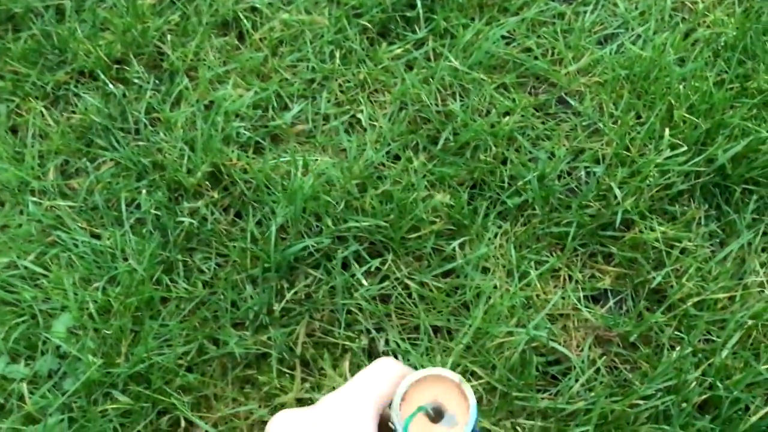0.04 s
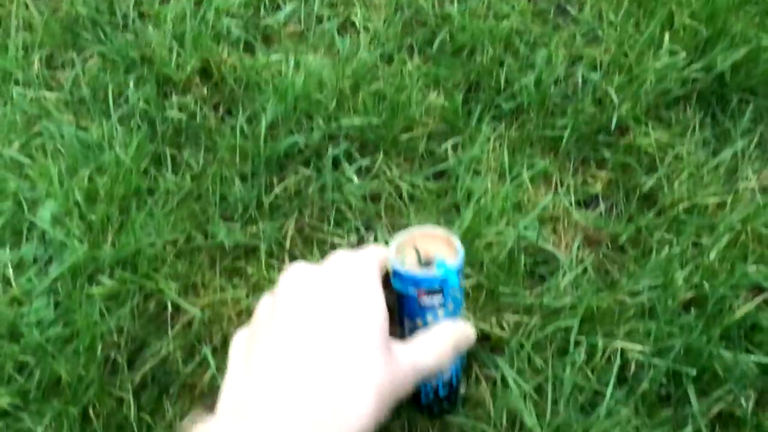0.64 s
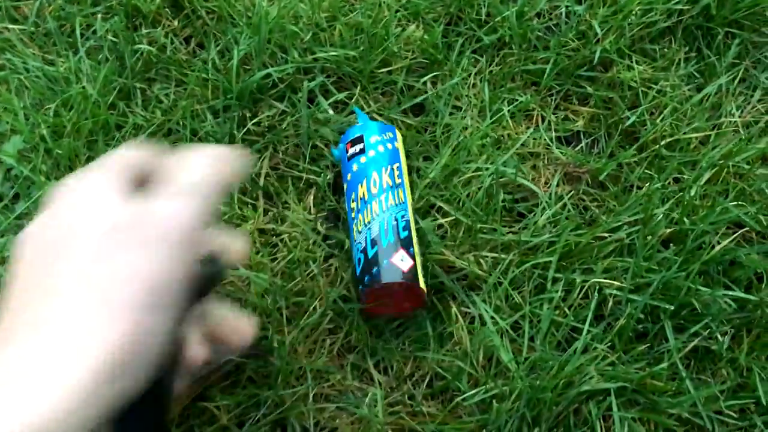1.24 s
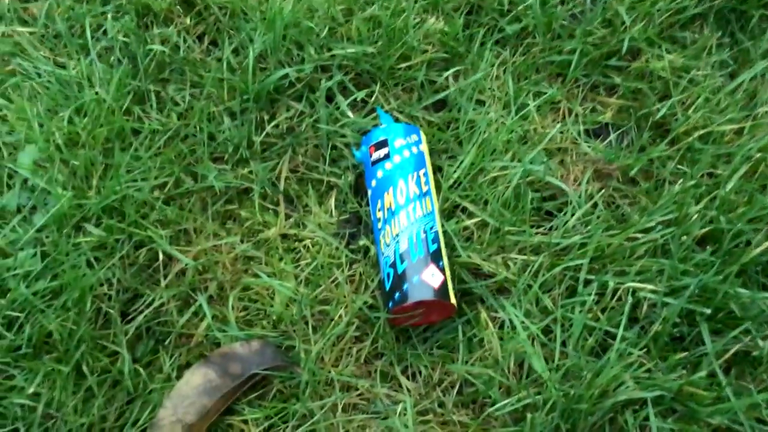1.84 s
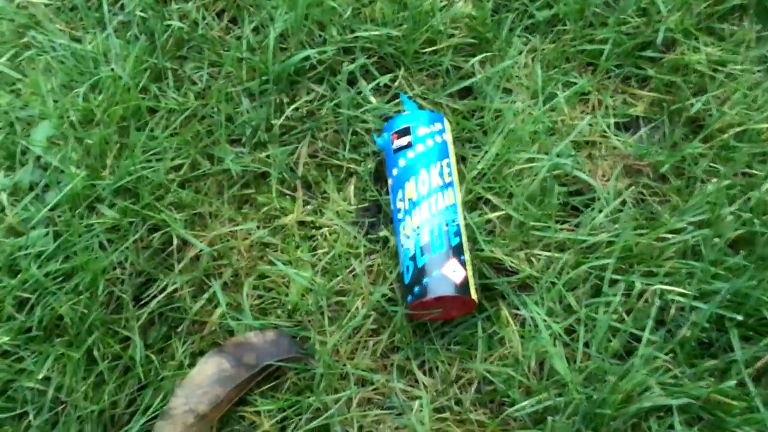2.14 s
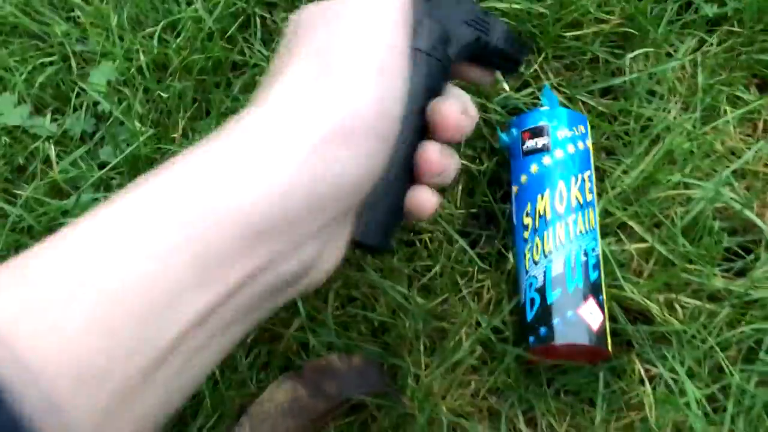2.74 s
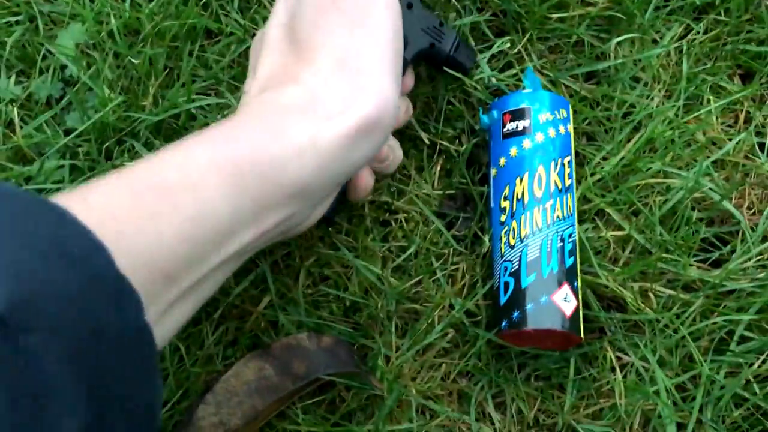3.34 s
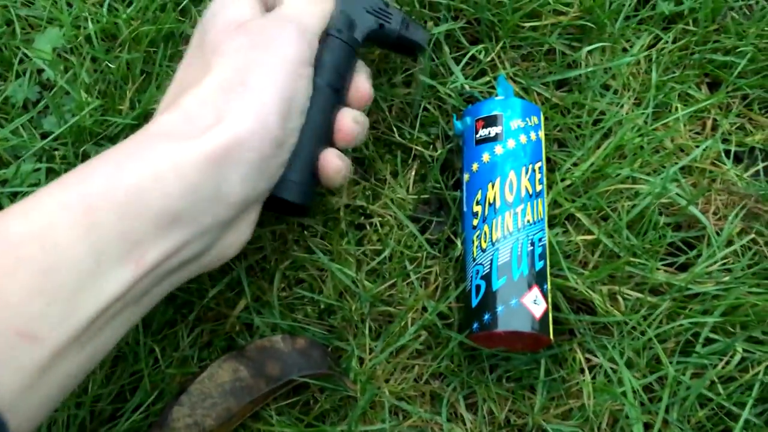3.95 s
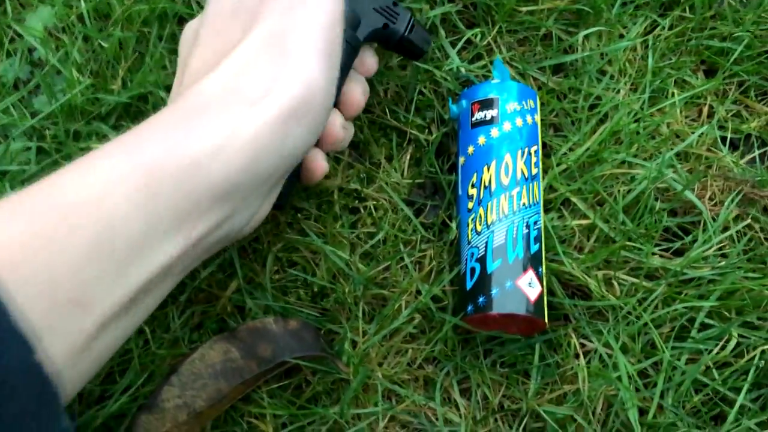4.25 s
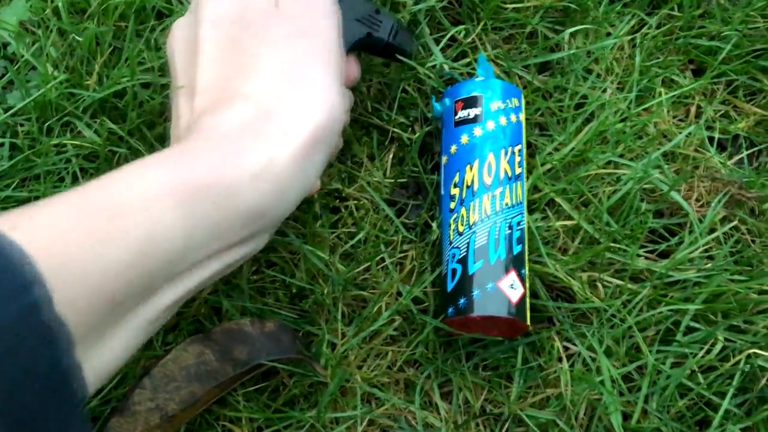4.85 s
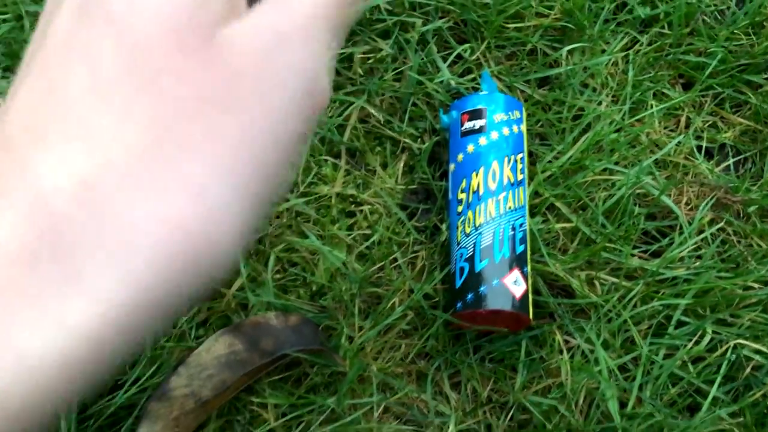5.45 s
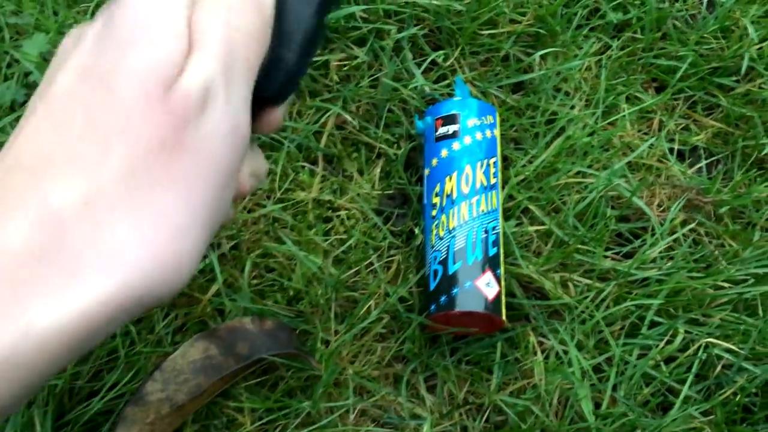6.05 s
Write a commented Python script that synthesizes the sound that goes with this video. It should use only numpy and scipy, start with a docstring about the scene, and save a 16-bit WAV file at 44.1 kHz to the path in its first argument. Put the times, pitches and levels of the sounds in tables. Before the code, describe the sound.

A gas torch lighter clicks and hisses softly twice outdoors, amid wind rumble on the microphone, handling bumps and sleeve scuffs.

```python
"""Torch lighter on a lawn

A smoke fountain is set down on open grass and a gas torch lighter is held to its fuse, close to a
hand-held camera. The trigger clicks, the jet hisses twice with a drifting comb of peaks and notches,
and short puffs of gas escape in between. Wind and handling rumble in the microphone; a jacket rustles,
and at the end its sleeve drags over the microphone port."""
import sys
import numpy as np
from scipy import signal
from scipy.fft import rfft, irfft, next_fast_len
from scipy.io import wavfile
from scipy.ndimage import uniform_filter1d

SR = 44100
rng = np.random.default_rng(int(sys.argv[2]) if len(sys.argv) > 2 else 0)


def dump(signal):
    """Clip the signal to [-1, 1] and save it as 16-bit WAV at the path in sys.argv[1]."""
    limited = np.clip(np.atleast_2d(signal).T, -1, 1)
    pcm = np.round(limited * 32767).astype(np.int16)
    wavfile.write(sys.argv[1], SR, pcm)


N = 273420
T = np.arange(N) / SR


# two burns at the fuse: t/s, length/s, level/dB, spit/dB, swell/dB, comb f/Hz at start, middle, end
BURNS = [(3.286, 0.425, -67, 4, 2, 6880, 6900, 6660), (4.411, 0.67, -66.5, 7, 1.5, 5960, 7050, 5060)]
# spectrum of the bare jet: f/Hz, level/dB
JET_SPECTRUM = [(200, -60), (800, -43), (2500, -7.5), (5000, -7), (7000, -3), (10000, -1), (12000, -3),
                (14000, -8.5), (15500, -0.5)]
# drifting peaks and notches in the hiss: multiple of the comb frequency, width/Hz, full gain/dB
JET_COMB = [(.985, 1600, 10.5), (1.15, 420, -14.5), (1.249, 1150, 8.5), (1.38, 700, -2), (.61, 500, 4.5),
            (.79, 700, -3), (1.62, 1100, 2), (1.85, 900, 4.5), (2.05, 1300, 6.5)]
# steady resonances of the torch head: f/Hz, width/Hz, full gain/dB
HEAD_RESONANCES = [(6850, 1400, 3.5), (8450, 700, 2.5), (13100, 1800, 7.5), (13500, 280, 4.5),
                   (14100, 800, 3), (10900, 1700, -4.5)]
# the top of the jet brightens late in each burn: middle t/s, length/s, gain/dB, f/Hz, width/Hz
FLARES = [(3.645, .085, 9, 15200, 1100), (4.91, 0.18, 8, 15000, 1600)]

def torch(open_s=0.015, shut_s=0.035, spit_s=0.01, surge_db=2.5, flutter_db=1.06):
    """The close gas jet spits, swells and flares; a comb in its hiss rises, deepens and sinks again."""
    out = np.zeros(N)
    for s, length, jet_db, spit_db, swell_db, first_hz, middle_hz, last_hz in BURNS:
        hz, t, jet = signal.stft(noise(JET_SPECTRUM, grain_db=0.6), SR, nperseg=512)
        hz = hz[:, None]
        progress = np.clip((t - s) / length, 0, 1)
        arch = 1 - (2 * progress - 1) ** 2
        bend_hz = middle_hz - (first_hz + last_hz) / 2
        comb_hz = first_hz + (last_hz - first_hz) * progress + bend_hz * arch
        strength = 0.4 + 0.58 * arch ** 1.4
        comb_db = sum(db * bump(hz, k * comb_hz, width) for k, width, db in JET_COMB)
        head_db = sum(db * bump(hz, at, width) for at, width, db in HEAD_RESONANCES)
        flare_db = sum(db * bump(hz, at, width) * bump(t, when, span)
                       for when, span, db, at, width in FLARES)
        colour = amp(strength * (comb_db + head_db) + flare_db + swell_db * arch)
        hiss = signal.istft(jet * colour, SR, nperseg=512)[1][:N]
        flow_db = spit_db * np.exp(-np.abs(T - s - open_s) / spit_s)
        flow_db += surge_db * bump(T, s + length - 0.056, 0.11)  # just before the valve shuts
        flow_db += flutter_db * wobble(35)
        out += bursts([(s, length, jet_db)], open_s, shut_s) * amp(flow_db) * hiss
    return out


# gas let out at the lighter: t/s, length/s, level/dB
PUFFS = [(3.645, 0.063, -66), (3.994, 0.035, -60), (4.203, 0.047, -65.5), (4.985, 0.053, -63)]
# spectrum of a puff: f/Hz, level/dB
PUFF_SPECTRUM = [(200, -70), (1500, -17), (2800, 9), (3700, 3), (4700, 2), (5600, 4), (7200, 7.5),
                 (8300, -1), (9400, 6), (11800, 3.5), (14000, 0), (15600, 1)]

def puffs():
    """Gas escapes in short puffs as the valve opens or shuts."""
    return bursts(PUFFS, rise_s=0.0064, fall_s=0.015) * noise(PUFF_SPECTRUM)


# airy whistle at the end of the second burn: t/s, level/dB, f/Hz
VALVE_WHISTLE = [(4.97, -90, 4900), (5.01, -74, 4750), (5.045, -68, 4650), (5.085, -80, 4500)]

def valve():
    """The last of the gas sings in the narrowing valve."""
    return moving_band(VALVE_WHISTLE, width_hz=610)


# lighter, trigger and camera case, close by: t/s, body level/dB, body f/Hz, snap level/dB, snap f/Hz
CLICKS = [(0.164, -55, 2900, -50, 9500), (0.171, -70, 2900, -56, 10500), (0.914, -78, 2900, -48, 11500),
          (1.5678, -37, 1520, -44, 7000), (2.7595, -70, 2900, -50.5, 10900),
          (2.9880, -54, 2820, -43.5, 11900), (3.055, -53, 2950, -53, 8000), (3.088, -72, 2900, -56, 9000),
          (3.1517, -72, 2930, -55, 8950), (3.2233, -46.5, 2880, -49, 4700),
          (3.3970, -42.5, 3040, -47, 4800), (3.6784, -58, 2960, -45.5, 7000),
          (5.0906, -39, 1500, -44.5, 3500)]
# modes of the plastic: multiple of the body frequency, gain/dB, t60/s
PLASTIC_MODES = [(.6, -11.5, 0.0059), (1, 2, 0.0084), (1.5, -0.5, 0.0053), (1.75, 15.5, 0.0014),
                 (2.4, 7, 0.00086)]

def clicks(contact_s=0.0003, snap_t60=0.0098, snap_octaves=2.3):
    """Each click rings the damped plastic body and adds a short bright snap."""
    out, t = np.zeros(N), np.arange(SR // 16) / SR
    contact = 1 - np.exp(-t / contact_s)
    octave = np.log2(np.fft.rfftfreq(len(t), 1 / SR) + 1)
    for s, body_db, hz, snap_db, snap_hz in CLICKS:
        ring = sum(amp(db - 60 * t / t60) * np.sin(2 * np.pi * k * hz * t)
                   for k, db, t60 in PLASTIC_MODES)
        snap = short_noise(len(t), bump(octave, np.log2(snap_hz), snap_octaves))
        add(out, s, (amp(body_db) * ring + amp(snap_db - 60 * t / snap_t60) * snap) * contact)
    return out


# breeze at the microphone between gusts: t/s, strength/dB
BREEZE = [(0, -59), (.17, -55), (.36, -52), (1.0, -42.5), (1.55, -42), (2.0, -38.5), (2.42, -35.5),
          (2.48, -51.5), (2.95, -44), (3.2, -50.5), (3.46, -56.5), (3.7, -52.5), (4.2, -55), (4.45, -55.5),
          (5.1, -57), (5.4, -44), (5.65, -46), (5.9, -56), (6.2, -50.5)]
# gusts on top of it: middle t/s, length/s, rise/dB, tilt from rumble to eddies/dB
GUSTS = [(0.235, 0.096, 10, -5), (0.475, 0.21, 10.5, -2), (0.657, 0.17, 9, -0.5), (0.756, 0.081, 10, -1),
         (0.85, 0.16, 7.5, 0.5), (1.012, 0.27, 1.5, 0.5), (1.148, 0.18, 5, 3.5), (1.324, 0.17, 6.5, -1),
         (1.62, 0.065, 9, -5), (1.704, 0.12, 5.5, -2.5), (1.814, 0.31, 3, 4), (2.027, 0.054, 10.5, 2),
         (2.116, 0.059, 8.5, -5.5), (2.191, 0.065, 6, 0), (2.28, 0.1, 5.5, 2.5), (2.382, 0.12, 4, 2.5),
         (2.632, 0.13, 12, -1), (2.706, 0.06, 12.5, -4), (2.85, 0.18, 8.5, 4.5), (3.038, 0.13, 5.5, 6),
         (3.16, 0.069, 7.5, -1.5), (3.302, 0.08, 9, 4), (3.392, 0.13, 5, -7), (3.536, .08, 7, -3),
         (3.614, 0.043, 10.5, -2), (3.727, 0.2, 5, -1.5), (3.865, 0.022, 10, -1.5), (3.969, 0.036, 6, -4),
         (4.064, 0.12, 5, -5), (4.162, 0.12, 15, -4.5), (4.351, 0.053, 6.5, -4.5),
         (4.837, 0.047, 8.5, -6.5), (5.06, 0.081, 8.5, 3.5), (5.22, 0.22, 6.5, 0.5)]
# spectra of the three wind layers, darkest first: f/Hz, level/dB
RUMBLE_SPECTRUM = [(12, -69), (25, -24), (38, -5), (52, 3), (85, 3), (120, -4), (200, -46), (600, -120)]
BUFFET_SPECTRUM = [(20, -69), (50, 0.5), (100, 1), (150, 3.5), (230, -4.5), (320, -23.5), (450, -55),
                   (800, -60), (2500, -120)]
EDDY_SPECTRUM = [(60, -57), (150, -12.5), (260, 7), (390, -2), (520, -11), (750, -21), (1200, -41.5),
                 (4000, -100)]

def wind(usual_strength_db=-40, unrest_db=1):
    """Wind on the microphone rumbles, buffets and eddies; brighter layers grow faster in a gust."""
    middle, length, rise, tilt = np.transpose(GUSTS)
    excess_db = curves(BREEZE)[0] + swells(zip(middle, length, rise)) - usual_strength_db
    tilt_db = swells(zip(middle, length, tilt))

    def follow(base_db, growth):
        return amp(base_db + growth * excess_db + unrest_db * wobble(14))

    rumble = follow(-39.5, growth=0.65) * amp(-tilt_db) * turbulence(RUMBLE_SPECTRUM, steady_s=0.095)
    buffet = follow(-41, growth=1.076) * turbulence(BUFFET_SPECTRUM, steady_s=0.12)
    eddy_gain = follow(-54, growth=1.24) * amp(tilt_db)
    eddies = unit(amp(3.3 * wobble(80)) * turbulence(EDDY_SPECTRUM, steady_s=0.095))
    return rumble + buffet + eddy_gain * eddies


# wind and handling, right on the camera: t/s, level/dB before trim, f/Hz, narrowness of the spectrum
THUMPS = [(0.368, -21, 102, 4.7), (0.429, -20.5, 85, 6.3), (0.486, -25.5, 190, 2.8), (0.663, -22, 126, 2.7),
          (0.758, -20, 161, 3.7), (0.779, -17, 91, 4), (0.829, -22, 150, 2.4), (0.87, -21.5, 170, 4),
          (1.139, -20.5, 183, 4.9), (1.173, -18, 106, 3.4), (1.304, -19, 78.5, 2.6), (1.367, -22, 170, 1.9),
          (1.394, -22, 129, 4.3), (1.607, -18.5, 200, 1.7), (1.615, -17, 80, 3.8), (1.687, -14, 215, 4),
          (1.693, -16.5, 191, 2), (1.806, -14.5, 102, 6.2), (1.858, -20, 182, 6.5), (1.936, -19, 165, 8.3),
          (2.009, -19.5, 214, 2.7), (2.032, -17.5, 234, 1.55), (2.102, -20.5, 205, 2),
          (2.119, -23, 131, 2.2), (2.13, -35, 84.6, 3.6), (2.172, -19.5, 190, 2.1), (2.195, -18, 190, 4),
          (2.246, -19, 176, 7.7), (2.266, -17, 150, 1.4), (2.307, -10, 230, 2.2), (2.712, -25, 75.5, 3.8),
          (2.882, -25, 189, 4.1), (3.009, -25.5, 140, 4), (3.287, -42, 656, 4.1), (3.383, -20, 75, 1.9),
          (3.61, -33.5, 170, 1.6), (4.141, -28, 131, 1.6), (4.177, -27.5, 95, 6.3),
          (5.346, -33.5, 393, 2.3), (5.486, -13.5, 275, 5.6), (5.5013, -18, 290, 5.2),
          (5.552, -15.5, 109, 2.7)]

def thumps(trim_db=-6.0):
    """Each thump is one swing of pressure whose spectrum peaks at its pitch and trails off upward."""
    out, t = np.zeros(N), np.arange(-SR // 20, SR // 20) / SR
    for s, db, hz, narrowness in THUMPS:
        swing = (1 - 2j * np.pi * hz * t / narrowness) ** -(narrowness + 1)
        add(out, s + t[0], amp(db + trim_db) * swing.imag)
    return out


# the sleeve leans on the camera and drags in pushes: t/s, length/s, level/dB
DRAGS = [(5.343, 0.89, -52.5), (5.433, 0.071, -39), (5.48, 0.18, -52), (5.725, 0.13, -52)]
# its hem scrapes over the case: t/s, length/s, level/dB
SCRAPES = [(5.408, 0.044, -53), (5.433, 0.02, -40.5), (5.446, 0.035, -52.5), (5.54, 0.013, -42),
           (5.816, 0.01, -45)]
# the cloth catches and slips: t/s, level/dB, t60/s, f/Hz
SLIPS = [(1.517, -46.5, 0.011, 1600), (1.543, -38.5, 0.009, 1600), (1.567, -35.5, 0.046, 1670),
         (2.114, -49, 0.15, 1560), (3.284, -50.5, 0.027, 1000), (5.343, -62, 0.036, 1500),
         (5.434, -35.5, 0.03, 1550), (5.456, -43, 0.043, 1340), (5.5405, -40, 0.04, 1000),
         (5.585, -63, 0.027, 1500), (5.742, -46.5, 0.082, 2500), (5.769, -38, 0.05, 1550),
         (5.779, -34, 0.03, 1550), (5.817, -36.5, 0.033, 2010), (5.827, -37.5, 0.051, 1750),
         (5.668, -40, 0.055, 850), (5.71, -48, .04, 1900), (6.101, -51, 0.04, 1600)]
# spectra of drag, scrape and slip: f/Hz, level/dB
DRAG_SPECTRUM = [(30, -52), (100, 19.5), (250, 13.5), (550, 10), (1000, 1.5), (1600, 0.5), (2500, -5),
                 (4200, -15), (5200, -29), (8000, -41), (15500, -59)]
SCRAPE_SPECTRUM = [(300, -24), (900, 12), (1700, 3), (2600, -6), (4200, -5), (5800, -14), (7500, -25),
                   (10000, -34), (15500, -37)]
SLIP_SPECTRUM = [(50, -62), (200, 29), (700, 1), (1050, 6.5), (1600, 15), (2400, 1.5), (3300, -6.5),
                 (6000, -38), (9000, -39), (15500, -42)]

def sleeve():
    """Dull, gritty friction on the camera itself, broken by sudden slips and crisp scrapes."""
    pushes = bursts(DRAGS, rise_s=0.0016, fall_s=0.061)
    drag = pushes * friction(DRAG_SPECTRUM, per_s=1300, spread_db=0)
    scrapes = bursts(SCRAPES, rise_s=0.0033, fall_s=0.025) * noise(SCRAPE_SPECTRUM, grain_db=5.5)
    return drag + scrapes + catches(SLIPS, SLIP_SPECTRUM, usual_hz=1600)


# low flutter as the sleeve nears the microphone port: t/s, length/s, level/dB
HOLLOW_FLUTTER = [(5.195, 0.11, -42)]
# squeak right on the port: t/s, level/dB, f/Hz
SQUEAK = [(5.432, -37, 803), (5.436, -40.5, 775), (5.446, -38, 664), (5.457, -36.5, 547), (5.464, -53, 520),
          (5.478, -48, 596), (5.503, -45, 569), (5.53, -53, 536)]

def port_scuff(jitter=0.071, tone_share=0.75):
    """The sleeve flutters hollowly, then sticks and slips across the port in a rough, falling squeak."""
    hollow = bursts(HOLLOW_FLUTTER, rise_s=0.0052, fall_s=0.061) * band_noise(238, width_hz=79)
    pitch_hz = curves(SQUEAK)[1] * (1 + jitter * wobble(500))
    tone = level(SQUEAK) * unit(np.sin(2 * np.pi * np.cumsum(pitch_hz) / SR))
    rasp = moving_band(SQUEAK, width_hz=260)
    return hollow + np.sqrt(tone_share) * tone + np.sqrt(1 - tone_share) * rasp


# the hand shifts on the fountain's cardboard tube, close by: t/s, length/s, level/dB
GRIP_SHIFTS = [(-.02, 0.12, -51.5), (.08, 0.12, -52.5), (.19, 0.082, -52), (.29, 0.11, -60)]
# the tube crackles under the fingers: t/s, level/dB, t60/s, f/Hz
CRACKLES = [(.0205, -36, 0.01, 1200), (.0385, -59, 0.01, 1450), (.051, -40, 0.02, 1430),
            (.062, -48, 0.026, 1590), (.087, -51, 0.044, 1450), (.194, -50, 0.06, 1400),
            (.208, -52, 0.046, 1400), (.2355, -44, 0.02, 1450), (.252, -48, 0.028, 1500),
            (.269, -47.5, 0.015, 1700), (.302, -48, 0.011, 1300), (.334, -49, 0.013, 1500)]
# spectra of crunch and crackle: f/Hz, level/dB
CRUNCH_SPECTRUM = [(150, 13), (500, 0.5), (1000, 4), (1500, 1), (2400, -7.5), (4000, -18), (6500, -21),
                   (15500, -26)]
CRACKLE_SPECTRUM = [(200, -25), (800, -2.5), (1450, 6.5), (2300, -6.5), (3600, -16), (5600, -9.5),
                    (7500, -21), (11000, -21), (15500, -26)]

def grip():
    """Fingers crunch softly on the tube, which answers with short, papery crackles."""
    shifts = bursts(GRIP_SHIFTS, rise_s=0.011, fall_s=0.035)
    crunch = shifts * friction(CRUNCH_SPECTRUM, per_s=690, spread_db=3.5)
    return crunch + catches(CRACKLES, CRACKLE_SPECTRUM, usual_hz=1450)


# the arm brushes jacket and grass beside the camera: t/s, length/s, level/dB
RUSTLES = [(.16, 0.23, -70), (.36, 0.13, -66.5), (.43, 0.23, -63), (.61, .19, -65), (.87, 0.18, -73),
           (1.04, 0.2, -69.5), (1.27, 0.65, -64), (1.85, 0.33, -66), (2.08, 0.27, -64.5),
           (2.3, 0.18, -60.5), (2.43, 0.494, -64), (2.87, 0.25, -69), (3.76, 0.14, -70), (4.98, 0.25, -64),
           (5.17, 0.22, -67)]
# quick swishes of the jacket: t/s, length/s, level/dB
SWISHES = [(1.196, 0.1, -59.5), (1.24, 0.063, -71.5), (1.566, 0.1, -55), (1.66, 0.18, -61.5),
           (2.478, 0.015, -49.5), (5.54, 0.048, -64)]
# cloth brushes on cloth: t/s, length/s, level/dB, f/Hz, width/Hz
BRUSHES = [(0.744, 0.097, -72, 4030, 2000), (1.03, 0.091, -68, 4230, 1800), (1.68, 0.11, -67.5, 5040, 1800),
           (2.085, 0.061, -58.5, 3850, 2100), (2.235, 0.058, -68, 4170, 600),
           (2.322, 0.076, -72, 2400, 400), (2.355, 0.1, -67.5, 4150, 550), (2.574, .16, -72.5, 3550, 400),
           (2.734, .22, -73, 2260, 300), (5.5, 0.071, -64, 9100, 4000)]
# spectra of rustle and swish: f/Hz, level/dB
RUSTLE_SPECTRUM = [(100, -73), (300, -42), (900, 18.5), (1400, 14), (2200, 9), (4000, 7.5), (6500, 6.5),
                   (9000, 2.5), (12000, -2), (15500, -3)]
SWISH_SPECTRUM = [(100, -60), (500, 5), (1600, 7), (3000, 0), (6000, 1), (9000, -2.5), (12000, -5.5),
                  (15500, -8)]

def jacket():
    """Fine-grained rustle of the moving arm, with a few swishes and soft, pitched brushes."""
    folds = amp(1.14 * wobble(25))  # the cloth folds unevenly
    rustle = bursts(RUSTLES, rise_s=0.043, fall_s=0.071) * folds * noise(RUSTLE_SPECTRUM, grain_db=1.5)
    swishes = bursts(SWISHES, rise_s=0.0013, fall_s=0.026) * noise(SWISH_SPECTRUM, grain_db=1.5)
    brushes = sum(bursts([(s, length, db)], rise_s=0.012, fall_s=0.055) * band_noise(hz, width)
                  for s, length, db, hz, width in BRUSHES)
    return rustle + swishes + brushes


# far-off outdoor air: t/s, level/dB
AIR_LEVEL = [(0, -58), (2.8, -61), (3.2, -61.5), (6.2, -61.5)]
# spectrum of that air: f/Hz, level/dB
AIR_SPECTRUM = [(60, 0), (300, 3), (500, -8), (800, -8.5), (1200, -8), (1700, -12), (2600, -19.5),
                (4500, -24), (7000, -28), (10000, -29.5), (15500, -31)]
# swells of a faint drone in the distance: middle t/s, length/s, level/dB
DRONE_SWELLS = [(.98, 0.73, -69), (1.444, 0.74, -70.5), (1.998, 0.57, -68), (2.795, 0.69, -72.5),
                (3.75, 0.45, -74.5)]

def garden():
    """Soft outdoor background in which a distant, narrow drone swells and fades."""
    drone_gain = swells([(s, length, amp(db)) for s, length, db in DRONE_SWELLS])
    drone = drone_gain * band_noise(1237, width_hz=170)
    air = amp(curves(AIR_LEVEL)[0] + 0.37 * wobble(1.2)) * noise(AIR_SPECTRUM)
    return air + drone


def amp(db):
    """Decibels to gain."""
    return 10 ** (np.asarray(db) / 20)


def unit(x):
    """x at rms 1."""
    return x / np.sqrt(np.mean(x ** 2) + 1e-20)


def bump(x, centre, width):
    """A bell curve of height 1."""
    return np.exp(-2 * ((x - centre) / width) ** 2)


def along(points, hz):
    """Points of (f/Hz, value) read on a log axis."""
    f, values = np.transpose(points)
    return np.interp(np.log(hz + 1), np.log(f), values)


def curves(rows, t=T):
    """Each column after the time, read at times t."""
    s, *columns = np.transpose(rows)
    return [np.interp(t, s, column) for column in columns]


def level(rows):
    """Gain from rows of (t/s, level/dB, ...), silent outside their span."""
    inside = (T >= rows[0][0]) & (T <= rows[-1][0])
    return amp(curves(rows)[0]) * uniform_filter1d(inside * 1., size=300)


def bursts(rows, rise_s, fall_s):
    """Envelope of flat, soft-edged bursts from rows of (t/s, length/s, level/dB)."""
    return sum(amp(db) * np.clip((T - s) / rise_s, 0, 1) * np.clip((s + length - T) / fall_s, 0, 1)
               for s, length, db in rows)


def swells(rows):
    """Sum of smooth arches from rows of (middle t/s, length/s, height)."""
    return sum(height * np.cos(np.pi * np.clip((T - s) / length, -.5, .5)) for s, length, height in rows)


def wobble(rate):
    """A smooth random curve, rate knots a second."""
    return signal.resample(rng.standard_normal(int(N * rate / SR) + 1), next_fast_len(N))[:N]


def add(track, s, sound):
    """Mix a sound into the track at time s."""
    part = track[max(round(s * SR), 0):][:len(sound)]
    part += sound[:len(part)]


def filtered(x, response):
    """x through a gain that depends on frequency."""
    size = next_fast_len(N + SR // 2)
    return irfft(rfft(x, size) * response(np.fft.rfftfreq(size, 1 / SR)), size)[:N]


def noise(spectrum, grain_db=0):
    """Coloured noise of rms 1; grain_db clumps it into tiny crackles."""
    source = rng.standard_normal(N) * amp(grain_db * wobble(700))
    return unit(filtered(source, lambda hz: amp(along(spectrum, hz))))


def short_noise(samples, gains):
    """A scrap of noise of rms 1, shaped by one gain per frequency bin."""
    return unit(irfft(rfft(rng.standard_normal(samples)) * gains, samples))


def band_noise(centre_hz, width_hz):
    """Noise of rms 1 in one resonance."""
    return unit(filtered(rng.standard_normal(N), lambda hz: bump(hz, centre_hz, width_hz)))


def moving_band(rows, width_hz):
    """Noise in one resonance that follows rows of (t/s, level/dB, f/Hz)."""
    hz, t, white = signal.stft(rng.standard_normal(N), SR, nperseg=512)
    resonance = bump(hz[:, None], curves(rows, t)[1], width_hz)
    band = signal.istft(white * resonance, SR, nperseg=512)[1][:N]
    return level(rows) * unit(band)


def turbulence(spectrum, steady_s):
    """Low noise whose strength stays even over spans longer than steady_s."""
    rough, span = noise(spectrum), int(steady_s * SR)
    power = uniform_filter1d(uniform_filter1d(rough ** 2, span), span)
    return rough / np.sqrt(np.abs(power) + 0.00058)


def friction(spectrum, per_s, spread_db):
    """Noise of rms 1 made of many tiny stick-slip ticks over a smooth hiss."""
    ticks = (rng.random(N) < per_s / SR) * rng.choice([-1, 1], N)
    sizes = amp(spread_db * np.minimum(rng.exponential(size=N), 3))
    source = unit(ticks * sizes) + 0.62 * rng.standard_normal(N)
    return unit(filtered(source, lambda hz: amp(along(spectrum, hz))))


def catches(rows, spectrum, usual_hz, rise_s=0.00046):
    """Sudden slips: each is decaying grit, its spectrum shifted from usual_hz to its own pitch."""
    out, t = np.zeros(N), np.arange(SR // 5) / SR
    hz = np.fft.rfftfreq(len(t), 1 / SR)
    for s, db, t60, pitch_hz in rows:
        grit = short_noise(len(t), amp(along(spectrum, hz * usual_hz / pitch_hz)))
        fade = np.minimum(t / rise_s, 1) * amp(-60 * t / t60)
        add(out, s, amp(db) * unit(grit * fade) * np.sqrt(np.mean(fade ** 2)))
    return out


def scene():
    """One microphone over open grass, no echo: lighter and handling close by, the garden far behind."""
    handling = thumps() + grip() + jacket() + sleeve() + port_scuff()
    lighter = clicks() + torch() + puffs() + valve()
    return (lighter + wind() + handling + garden())[None]


# treble ripples of the camera's microphone port: f/Hz, width/Hz, gain/dB
PORT_RIPPLES = [(10400, 350, -5), (7520, 740, -2), (4990, 310, -2.5), (12160, 1400, 2.5)]

def record(dry):
    """The microphone port ripples the treble; the camera keeps nothing above its band limit."""
    def response(hz, top_hz=15800):
        ripple_db = sum(db * bump(hz, at, width) for at, width, db in PORT_RIPPLES)
        return amp(ripple_db) * (hz < top_hz)

    return filtered(dry[0], response)[None]


dry = scene()
out = record(dry)
dump(out)
```